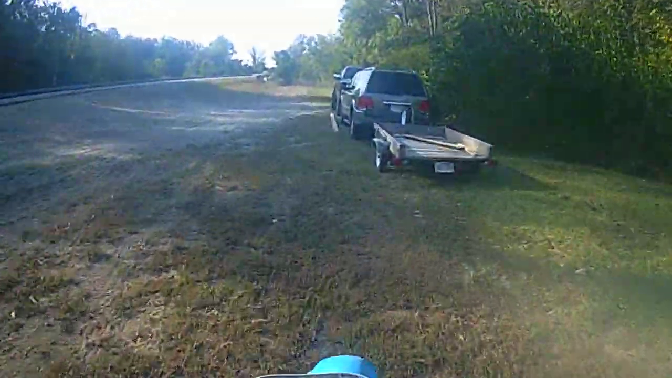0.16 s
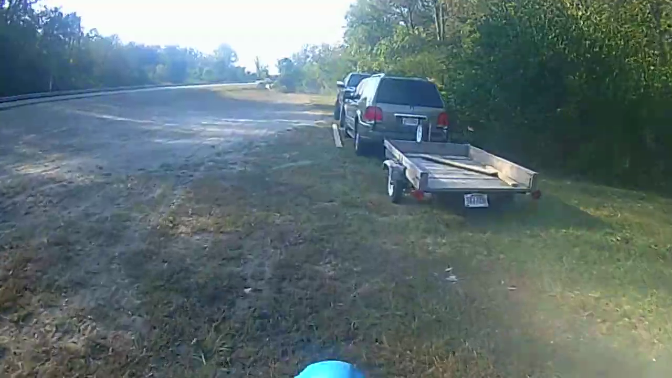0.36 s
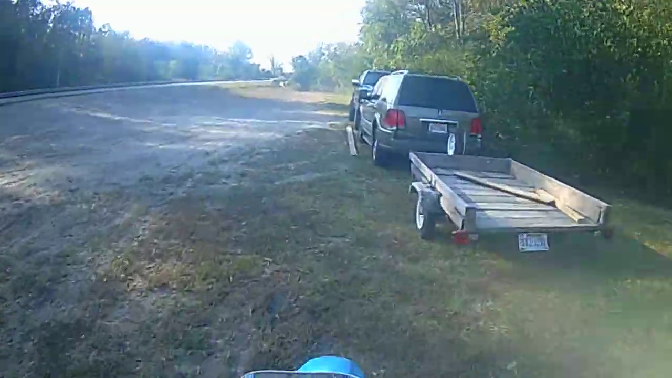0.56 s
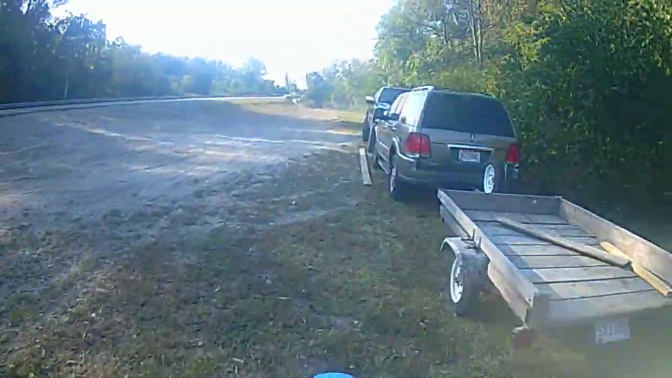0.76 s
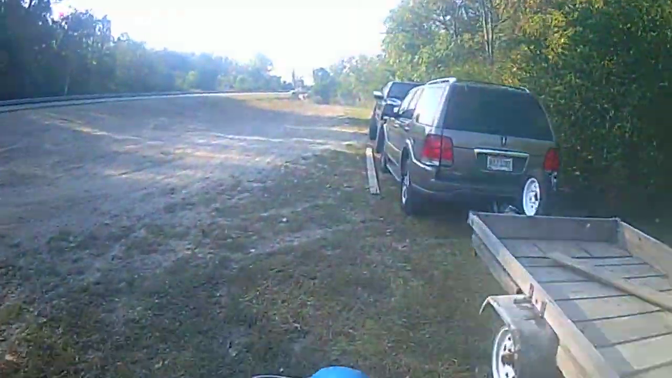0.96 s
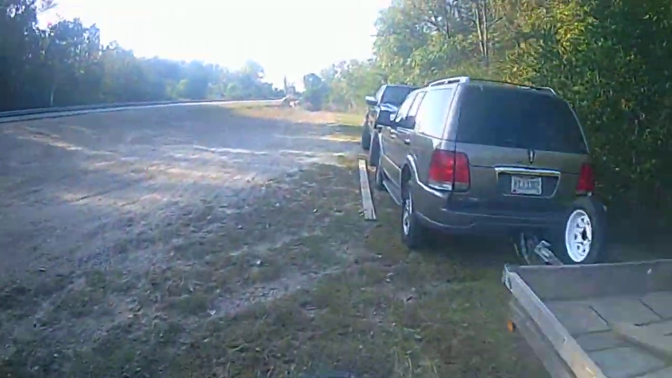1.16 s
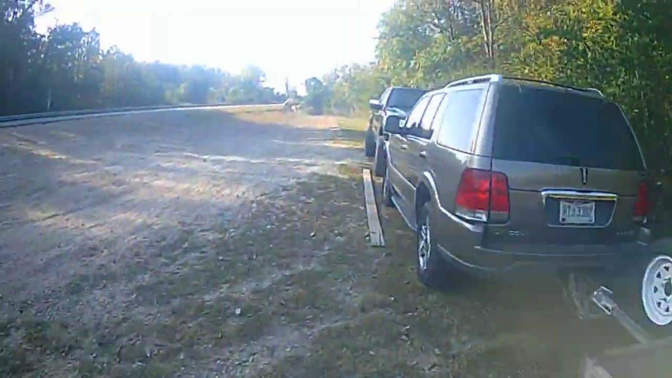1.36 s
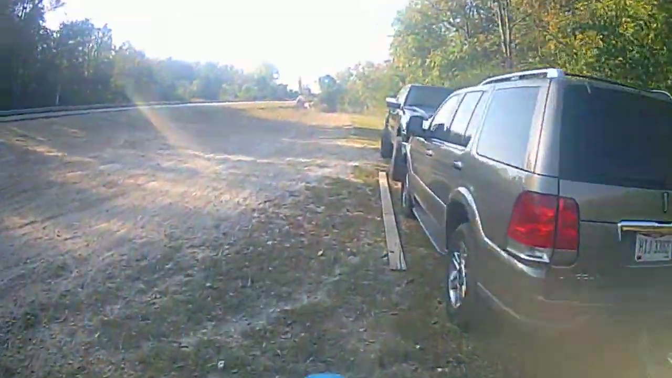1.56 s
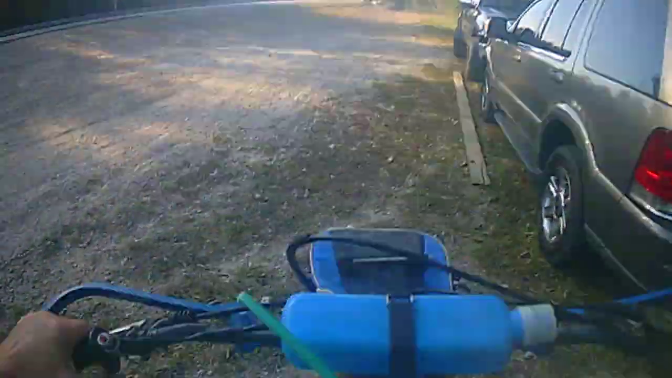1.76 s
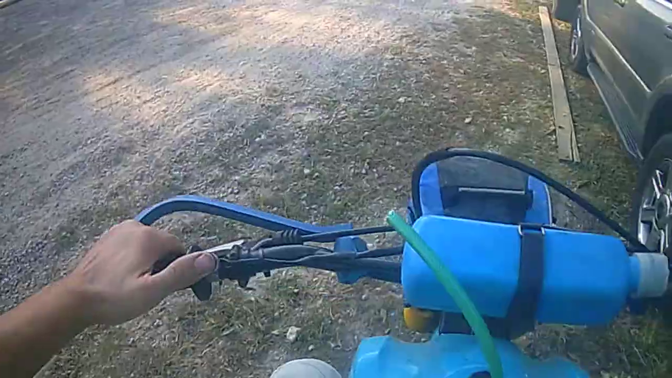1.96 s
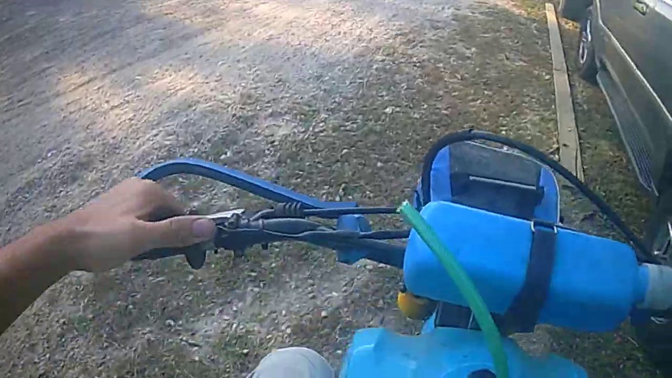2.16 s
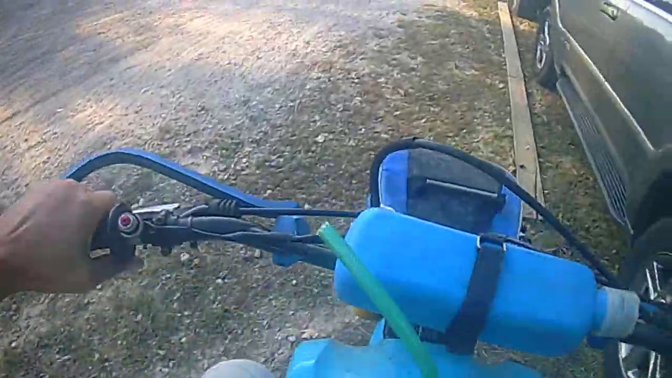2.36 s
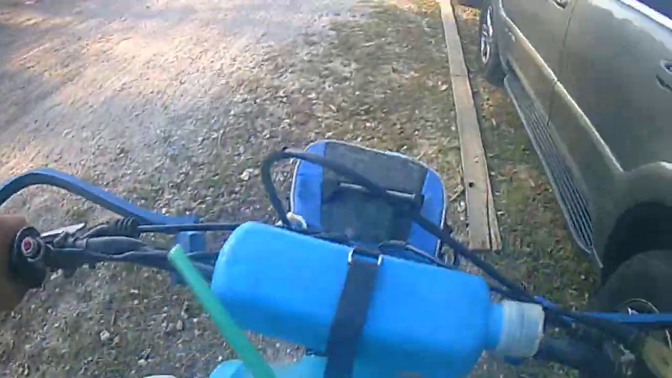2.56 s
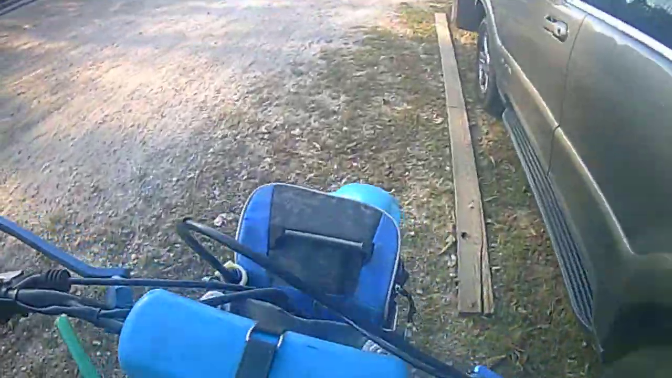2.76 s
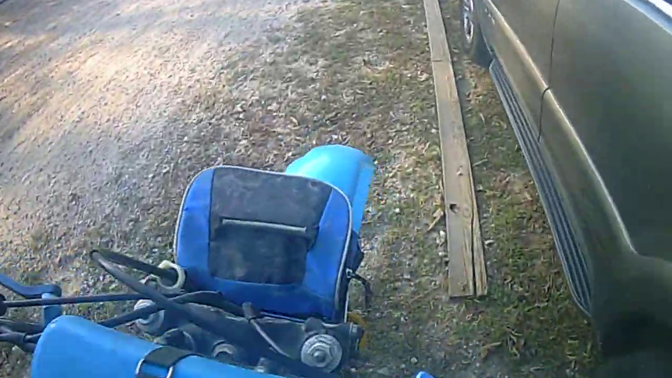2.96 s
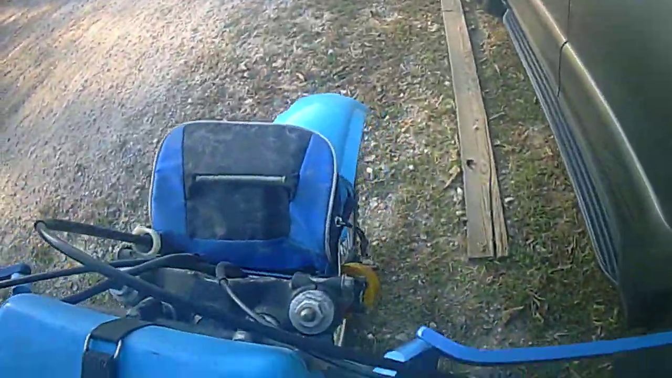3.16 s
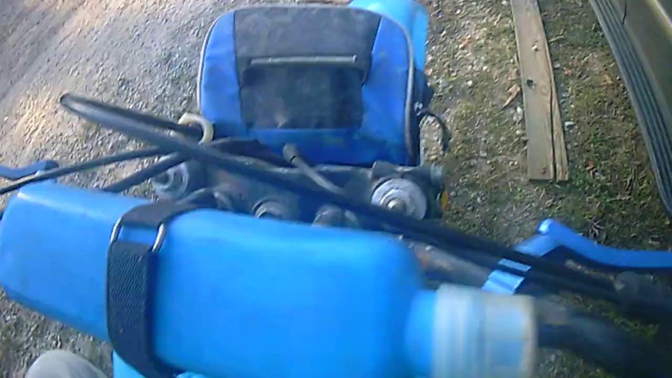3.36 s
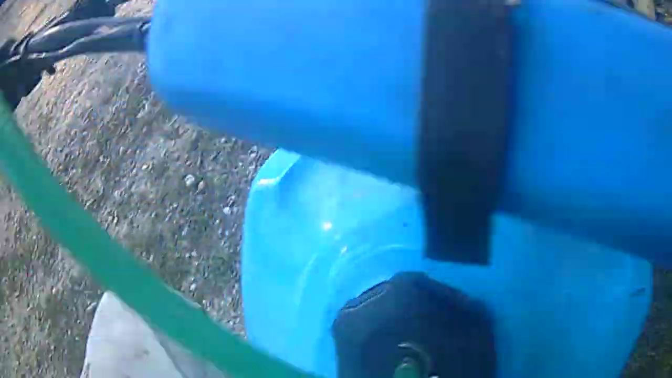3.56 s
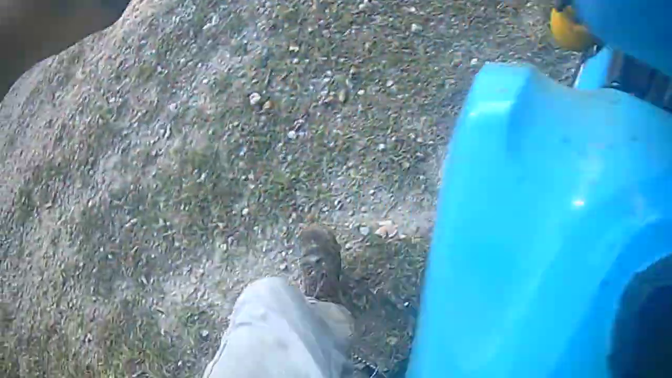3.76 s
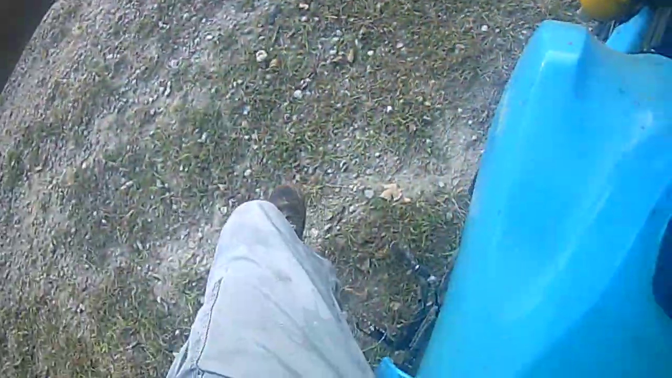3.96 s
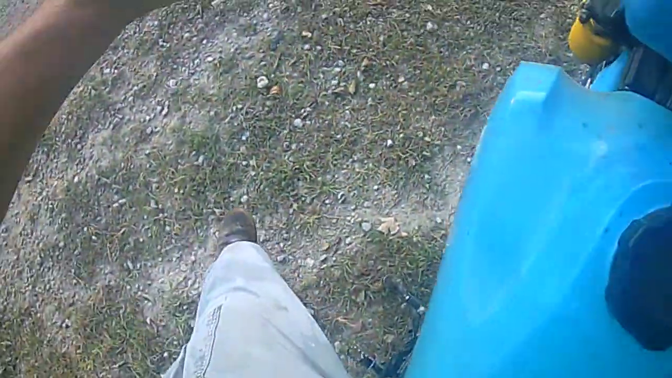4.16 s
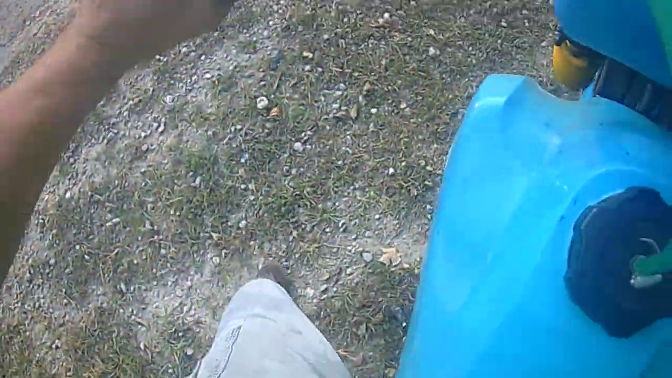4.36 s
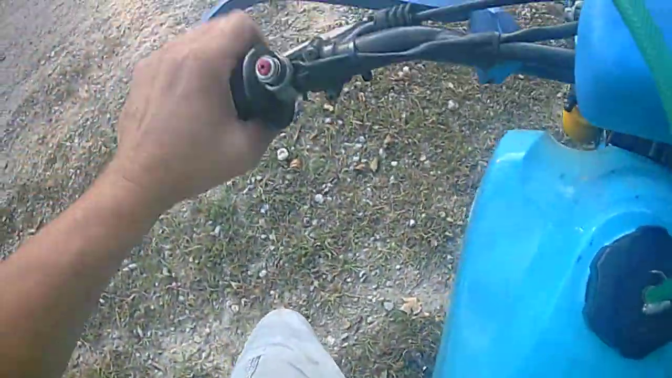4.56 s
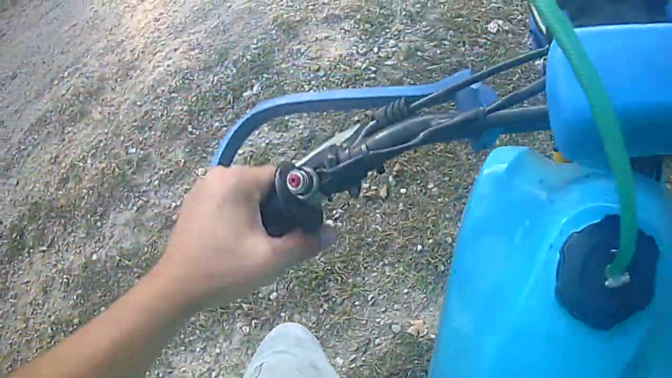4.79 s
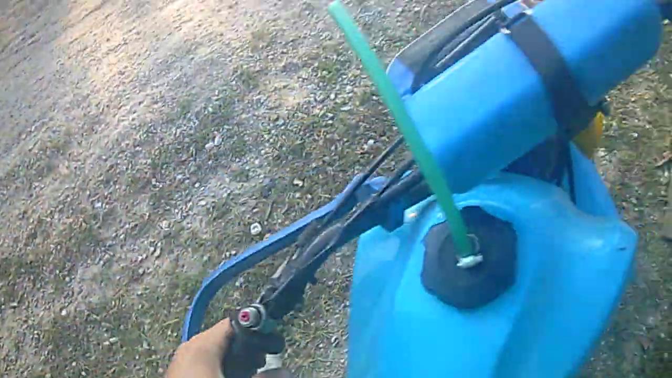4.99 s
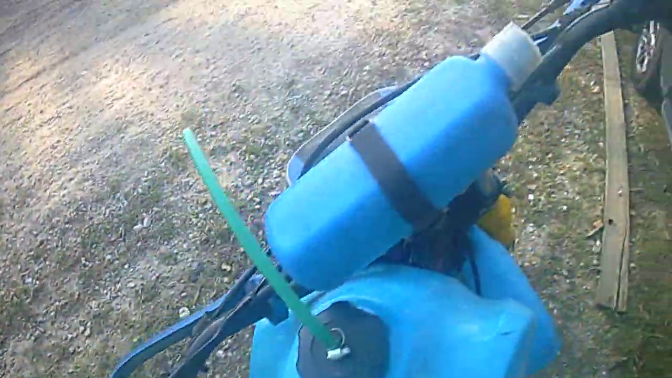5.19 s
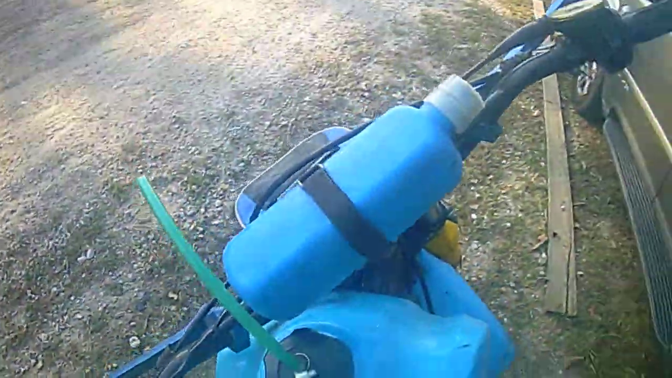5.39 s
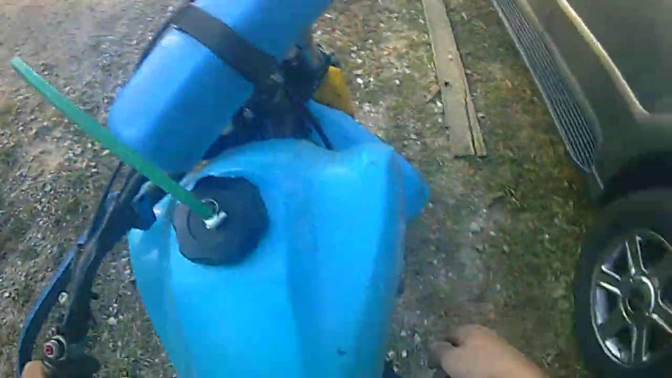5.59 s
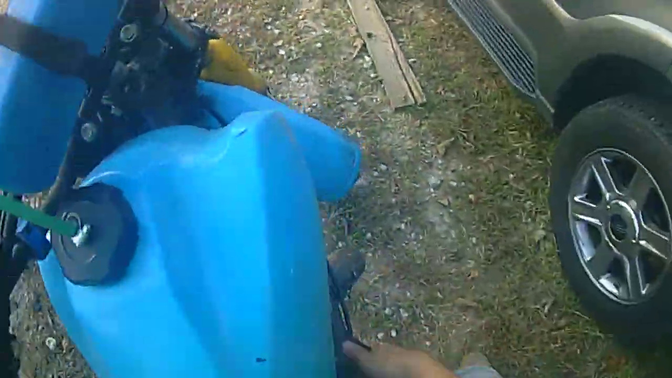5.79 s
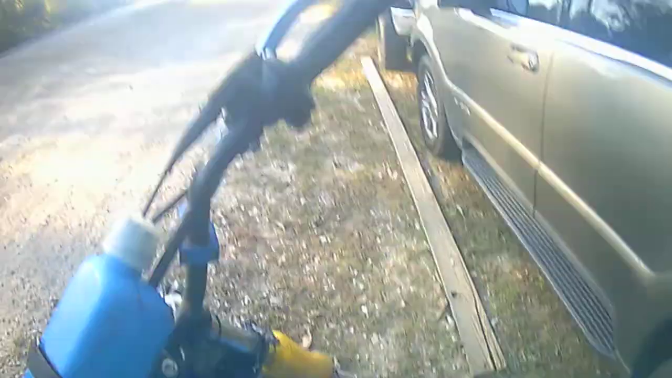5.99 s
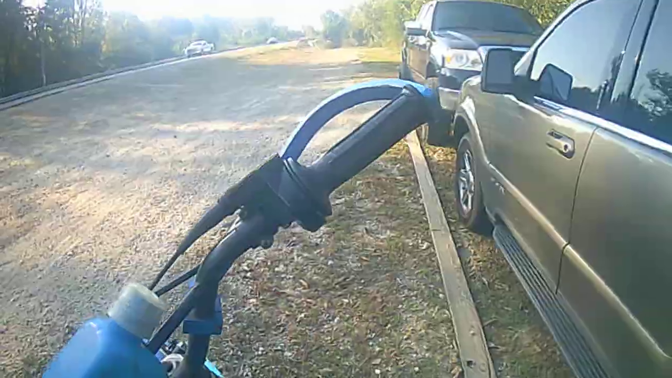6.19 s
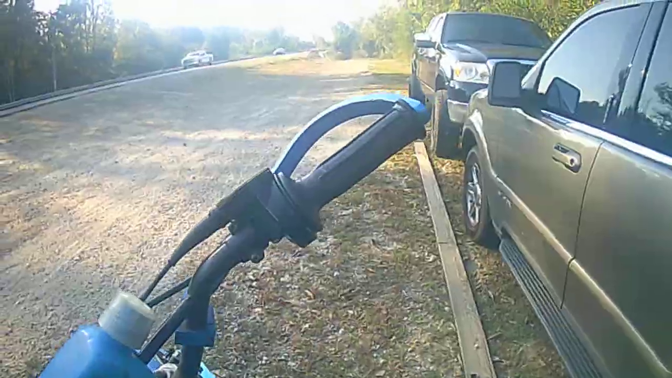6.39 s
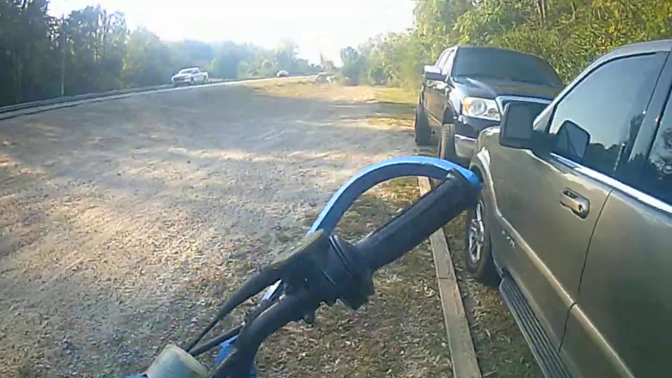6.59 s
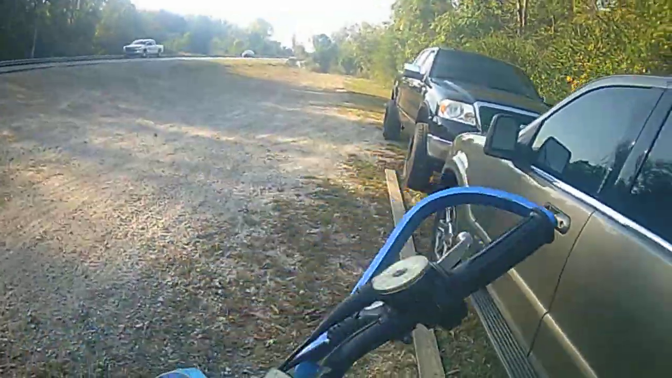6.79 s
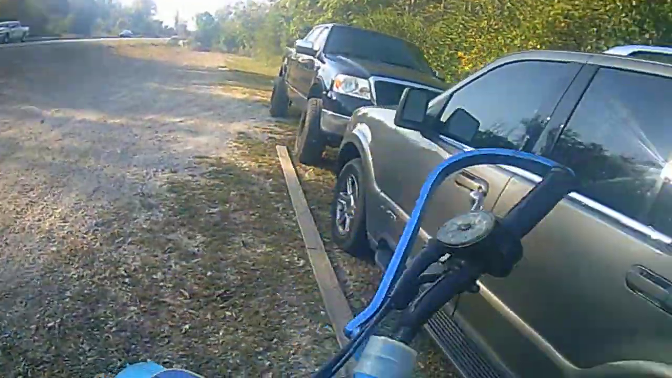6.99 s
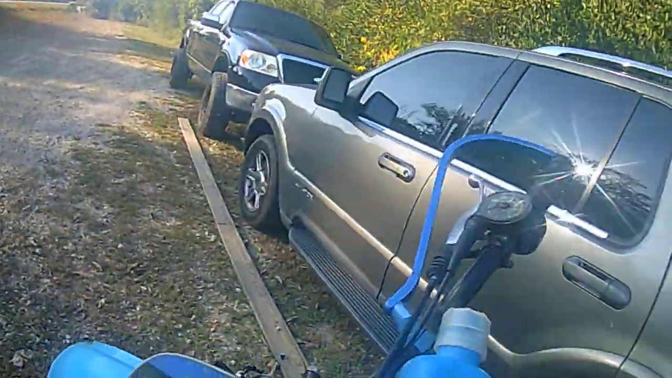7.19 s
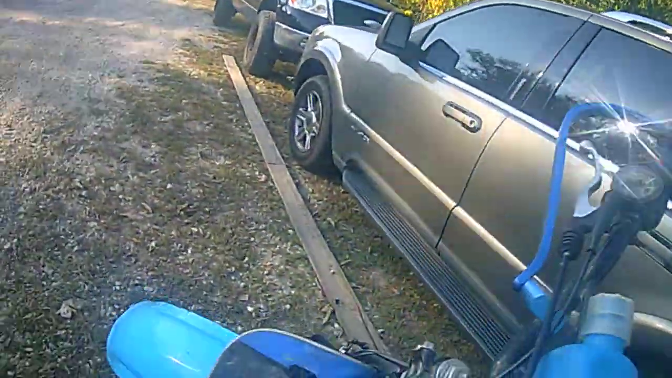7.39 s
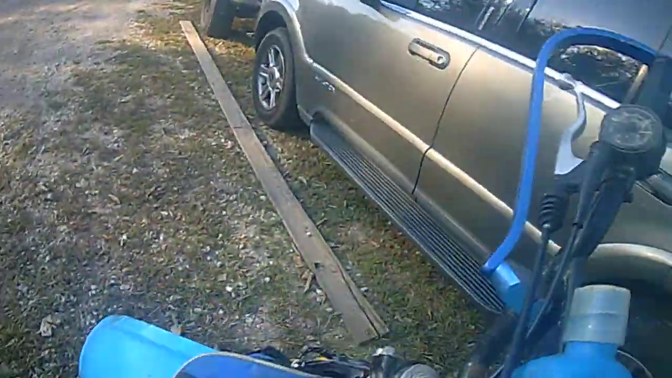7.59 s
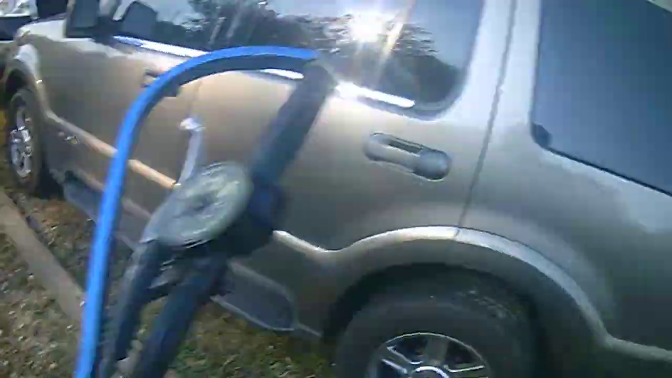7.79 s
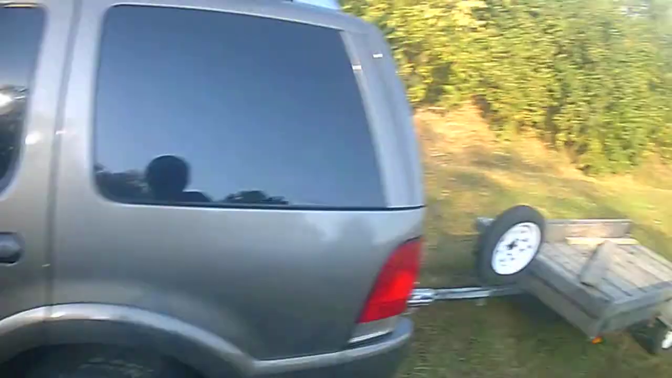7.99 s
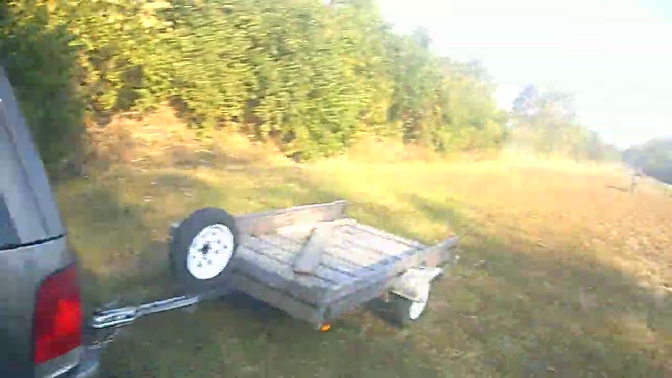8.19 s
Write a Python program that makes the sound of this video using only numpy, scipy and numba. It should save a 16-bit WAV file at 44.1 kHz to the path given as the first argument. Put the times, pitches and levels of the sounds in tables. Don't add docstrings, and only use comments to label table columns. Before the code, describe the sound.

A dirt bike engine putters through buffeting wind, cuts out and stumbles to a stop, followed by metallic knocks and a car approaching on a nearby road.

```python
import sys
import numpy as np
from scipy import signal
from scipy.io import wavfile
from scipy.ndimage import uniform_filter1d
from numba import njit

SR = 44100
rng = np.random.default_rng(int(sys.argv[2]) if len(sys.argv) > 2 else 0)


def generate_wav(signal):
    frames = np.transpose(np.atleast_2d(signal))
    scaled = np.clip(frames, -1, 1) * 32767
    pcm = np.round(scaled).astype(np.int16)
    wavfile.write(sys.argv[1], SR, pcm)


def magnitude_from_level(level_db):
    exponent = np.asarray(level_db, float) / 20
    return 10 ** exponent


N = 363384
TIME = np.arange(N) / SR


def level(x, db):
    return x * magnitude_from_level(db) / np.sqrt(np.mean(x ** 2))


def columns(table):
    s, *rest = np.transpose(table)
    return [np.interp(TIME, s, c) for c in rest]


def after(s, rise):
    return np.clip((TIME - s) / rise, 0, 1)


def dip(s, db, width):
    return db * np.exp(-((TIME - s) / width) ** 2)


def emerging(far_db, s, db_per_s):
    return far_db + db_per_s * np.maximum(TIME - s, 0)


def noise():
    return rng.standard_normal(N)


def walk(rate):
    hold = int(SR / rate)
    steps = np.repeat(rng.standard_normal(N // hold + 1), hold)
    return 0.91 * uniform_filter1d(uniform_filter1d(steps, hold), hold)[:N]


@njit
def svf(x, hz, width):
    y, b, l = np.empty(len(x)), 0., 0.
    g, k = np.tan(np.pi * hz / SR), width / hz
    for i in range(len(x)):
        v = (b + g * (x[i] - l)) / (1 + g * (g + k))
        b, l, y[i] = 2 * v - b, l + 2 * g * v, k * v
    return y


def ring(x, modes, order=1):
    out = 0
    for k, (hz, width, db) in enumerate(modes):
        y = x + 1e-18
        for _ in range(order):
            y = svf(y, float(hz), float(width))
        out = out + (-1) ** (k * order) * magnitude_from_level(db) * y
    return out


def low_pass(x, hz, order):
    return signal.sosfilt(signal.butter(order, hz, fs=SR, output="sos"), x)


def engine_levels(octaves):
    # time in seconds, level in dB.
    exhaust = [(0, -0.5), (1.5, -1.06), (2.0, -2.5), (2.1, -8.5), (2.3, -6), (2.45, -8.5), (2.62, -18.5),
               (2.82, -17.5), (2.97, -24), (3.14, -22), (3.36, -36), (3.7, -52)]
    throttle_shut_s, drive_stops_s = 1.98, 2.93
    pipe = columns(exhaust)[0]
    stopped = after(drive_stops_s, 0.076)
    coasting = after(throttle_shut_s, .12) - after(drive_stops_s, 0.25)
    silencer = pipe - 9 + 8 * coasting
    thump_top = -13.5 - 4 * (1 - after(2.4, .1))
    thump = np.minimum(pipe - 2, thump_top) + dip(2.2, -4.5, .25)
    clatter = -14.5 - 5 * octaves * (1 + 0.46 * stopped) - 4.5 * stopped
    airbox = -18.5 - 6 * octaves + dip(2.7, -9.5, 0.16)
    heave = -28 - 15 * (1 - stopped) - 6 * np.maximum(octaves - 2, 0)
    panel = pipe - 41 + dip(2.05, 25, .35)
    return pipe, silencer, thump, clatter, airbox, heave, panel


def engine():
    # time in seconds, speed in turns per s.
    crank = [(0, 42.2), (.35, 41.07), (1.15, 40.06), (2.05, 34.3), (2.2, 30.8), (2.23, 37.7), (2.45, 28.97),
             (2.95, 13.62), (3.15, 10.35), (3.6, 4.1), (3.8, .1)]
    # centre in Hz, width in Hz, level in dB.
    pipe = [(283.35, 86.4, 6), (248.3, 34.3, -4.5), (376.8, 19, -20.5)]
    # centre in Hz, width in Hz, level in dB.
    silencer = [(196.3, 53, 0)]
    # centre in Hz, width in Hz, level in dB.
    thump = [(100.6, 87, 0)]
    # centre in Hz, width in Hz, level in dB.
    casing = [(1851, 226, 0), (1265, 330, -3), (532, 453, -3), (2393, 180, -6.5), (358, 235, 8)]

    crank_speed = columns(crank)[0]
    lead = int(.008 * SR)
    turns = -.57 + np.cumsum(crank_speed) / SR + lead * crank_speed / SR
    hunting = .035 * walk(14) * (1 - .7 * after(2.0, .1)) * (TIME < 2.6)
    turns = np.maximum.accumulate(turns + hunting)
    whole = np.floor(turns).astype(int) + 4
    chance = rng.standard_normal((120, 2))
    speed = np.maximum(np.gradient(turns), 5 / SR)

    new_turn = np.diff(whole, prepend=whole[0]) == 1
    puffs = new_turn * magnitude_from_level(1.7 * chance[whole, 0]) / np.sqrt(speed)
    puff_s = .0024
    puffs = np.convolve(puffs, np.hanning(int(puff_s * SR)))[:N] / np.sqrt(.375 * puff_s * SR)
    bounce = after(2.5, 0.48)
    returns = 0.29 * np.roll(puffs, int(0.01313 * SR)) + 0.49 * np.roll(puffs, int(.0275 * SR))
    puffs = puffs + bounce * returns
    turbulence_db = np.interp(TIME, [2.0, 2.6, 2.9, 3.0], [-11, -1, 0, -2])
    gas = puffs + magnitude_from_level(turbulence_db) * np.exp(-(turns % 1) / .5) * noise()

    slap = 1.8 + magnitude_from_level(3 * chance[whole, 1]) * np.exp(-((turns - .6) % 1) / 1.2)
    grit = magnitude_from_level(1.3 * uniform_filter1d(noise(), size=60) * np.sqrt(60))
    clatter = ring(slap * grit * noise(), casing, order=2)
    unrung_slap = (0.35 + np.exp(-((turns - .62) % 1) / 0.15)) * grit * noise()
    clatter = clatter / clatter.std() + level(unrung_slap, -5.5)

    parts = [
        ring(gas, pipe, order=2),
        ring(gas, silencer, order=2),
        -ring(np.roll(gas, int(0.0026 * SR)), thump, order=2),
        clatter,
        ring(gas, [(37.9, 37, 0)], order=2),
        ring(gas, [(24, 8.8, 0)], order=2),
        ring(gas, [(666.4, 38, 0)], order=2),
    ]
    octaves = np.log2(crank[0][1] / crank_speed)
    out = 0
    for part, db in zip(parts, engine_levels(octaves)):
        out = out + part / part[TIME < 2].std() * magnitude_from_level(db)
    return np.clip((3.75 - TIME) / 0.078, 0, 1) * out


def wind():
    # time in seconds, peak in dB.
    gust_peaks = [
        (0, -6.5),
        (.21, -5),
        (.62, -6),
        (1.298, -15.5),
        (1.572, -10),
        (2.3, -22.5),
    ]
    breeze_db, rise_db_s, fall_db_s = -23.5, 291, 59
    buffet = ring(noise(), [(54.0, 123, 0)], order=2) * magnitude_from_level(0.75 * walk(17))
    gusts = [db - np.maximum(rise_db_s * (s - TIME), fall_db_s * (TIME - s)) for s, db in gust_peaks]
    wind_db = np.maximum(np.max(gusts, axis=0), breeze_db) - 3.0
    return level(buffet, wind_db) * np.clip((2.6 - TIME) / 0.86, 0, 1)


def contacts(rows):
    out = 0
    for s, db, contact_s in rows:
        age = np.maximum(TIME - s, 0) / contact_s
        out = out + np.minimum(age * 3, 1) * np.exp(-age) * magnitude_from_level(db)
    return out


def knocks():
    # start in seconds, peak in dB, contact in seconds.
    ticks = [
        (2.2004, 3.5, 0.0073),
        (3.7195, -17.5, 0.0043),
        (4.463, -20.5, 0.0049),
        (4.487, -26, .005),
        (4.6324, -23.5, 0.0081),
    ]
    # start in seconds, peak in dB, contact in seconds.
    clanks = [
        (2.379, -9.5, 0.0083),
        (3.1652, -25, 0.0089),
        (3.4191, -23, 0.014),
        (3.7255, -6.5, 0.0097),
        (3.8796, -33, 0.0079),
        (4.3929, -29, 0.0073),
        (4.9435, -11, 0.0038),
    ]
    # start in seconds, peak in dB, contact in seconds.
    thuds = [
        (2.785, -15, 0.0034),
        (3.0716, -22, 0.0064),
        (3.643, -24.5, 0.0068),
        (3.692, -23, 0.0052),
        (3.841, -23.5, 0.012),
        (4.871, -27.5, 0.008),
        (4.906, -23, 0.0058),
        (4.955, -15.5, 0.0043),
        (8.112, -38, 0.0026),
    ]
    # start in seconds, peak in dB, contact in seconds.
    scuffs = [
        (2.9301, -27, .011),
        (3.293, -33, 0.0055),
        (3.327, -23.5, 0.0074),
        (4.445, -35, .0067),
        (4.962, -25, 0.0077),
        (4.9742, -20.5, 0.0037),
        (4.9854, -26.5, 0.011),
        (5.019, -28, 0.0042),
    ]
    # start in seconds, peak in dB, contact in seconds.
    pings = [(2.745, -18.5, .005), (2.806, -19, 0.0053), (2.87, -20, 0.0075), (2.932, -34, 0.0032),
             (2.99, -23, .005), (3.03, -30, .012), (3.115, -16, 0.006), (3.17, -23, 0.0041),
             (3.33, -15.5, 0.0046), (7.873, -31, .003), (7.908, -39, 0.0033), (7.99, -25, .003),
             (8.018, -25, 0.0049), (8.07, -33, .003)]
    # centre in Hz, width in Hz, level in dB.
    metal = [(1240, 70, 2.5), (1750, 82, 13), (2070, 99, -4), (1900, 30, 8.5), (2280, 220, -34),
             (3120, 140, -9), (1380, 1400, 2), (3500, 1000, -4.5), (1070, 120, -9), (4420, 220, 3.5)]
    # centre in Hz, width in Hz, level in dB.
    frame = [(420, 95, -5), (232, 35, -0.5), (140, 21, -6), (541, 58, -7), (700, 19, -16)]
    # centre in Hz, width in Hz, level in dB.
    tank = [(659, 60, -7), (1054, 48, 2.5)]
    # centre in Hz, width in Hz, level in dB.
    lever = [(1815, 17, 12.5), (2900, 28, 3), (4230, 60, 3.5), (3500, 900, -5), (1990, 49, 2)]

    pushes = [contacts(rows) for rows in (clanks, thuds, ticks, scuffs)]
    frame_push = magnitude_from_level([-1.6, 6.5, -21, 2.6]) @ pushes
    grit_push = magnitude_from_level([-32.5, -41.5, -22.5, -16.5]) @ pushes
    out = magnitude_from_level(2.5) * ring(sum(pushes) * noise(), metal)
    out = out + magnitude_from_level(21.5) * ring(frame_push * noise(), frame)
    out = out + magnitude_from_level(31.0) * ring(grit_push * noise(), [(6500, 14000, 0.0091)])
    out = out + magnitude_from_level(10) * ring((pushes[0] + 1.6 * pushes[1]) * noise(), tank)
    return out + magnitude_from_level(14) * ring(contacts(pings) * noise(), lever)


def tone(table, wobble):
    hz, db = columns(table)
    phase = 2 * np.pi * np.cumsum(hz * (1 + wobble * walk(3.1))) / SR
    return np.sqrt(2) * magnitude_from_level(db + 2.7 * walk(34)) * np.sin(phase)


def car():
    # time in seconds, level in dB.
    tyre_roar = [(3.5, -44), (4.25, -45.5), (5.4, -39.5), (5.95, -41.5), (6.5, -38), (7.1, -36.5),
                 (8.24, -40)]
    # time in seconds, pitch in Hz, level in dB.
    drone = [(3.4, 129, -37.5), (3.84, 132.7, -41), (5, 134.7, -39.5), (6, 136.6, -42), (7, 138.8, -41),
             (7.6, 133.4, -42), (8.24, 142.6, -40.5)]
    # time in seconds, pitch in Hz, level in dB.
    whine = [(3.4, 222, -83.5), (3.6, 220, -51), (3.95, 235.6, -33), (4.1, 239, -64), (8.3, 213, -99)]
    # centre in Hz, width in Hz, level in dB.
    rumble_bands = [(31.7, 71, -3.5), (83, 8.9, -3), (175.7, 40, -2.5), (210, 19, 0.5), (241.6, 49, -3.5)]

    swell = 1.0 * walk(3)
    roar = ring(noise(), [(1242, 470, 0.085), (1480, 590, 0), (1780, 700, 0.84)], order=2)
    roar = low_pass(roar, 1805, order=4)
    roar = roar - ring(roar, [(826, 74, 0.01)])
    roar = level(roar, columns(tyre_roar)[0] + swell + 1.2 * walk(11))

    body = ring(noise(), [(446, 270, 2.5), (594, 200, -8.5)], order=2)
    upper_db = np.interp(TIME, [6, 7.2], [-14, 0])
    body = body + magnitude_from_level(upper_db) * ring(noise(), [(890, 280, 0.033)], order=2)
    body = level(body, emerging(far_db=-48, s=5.96, db_per_s=3.76) + swell + 1.5 * walk(14))

    hiss_db = emerging(far_db=-55.5, s=6.17, db_per_s=5.7) + 1.1 * walk(12)
    hiss = level(ring(noise(), [(2900, 1200, 0)], order=2), hiss_db)
    rumble_db = emerging(far_db=-35.5, s=6.74, db_per_s=1.8) + swell + 0.77 * walk(5.5)
    rumble = level(ring(noise(), rumble_bands, order=2), rumble_db)
    return roar + body + hiss + rumble + tone(drone, 0.0045) + tone(whine, 0.0049)


def air():
    # time in seconds, pitch in Hz, level in dB, length in seconds.
    chirps = [
        (8.148, 2900, -40, 0.011),
        (8.192, 2900, -31, 0.007),
    ]
    hiss = ring(noise(), [(7250, 2000, -14.5), (3960, 1000, -17)])
    out = level(hiss, -46 + 9 * after(7.5, 1) + walk(5))
    for s, hz, db, length in chirps:
        out = out + magnitude_from_level(db) * np.exp(-((TIME - s) / length) ** 2) * np.sin(2 * np.pi * hz * TIME)
    return out


def scene():
    return (engine() + wind() + knocks() + car() + air())[None]


def housing(x):
    port = ring(x, [(6400, 2230, -26.5), (3980, 1600, -37), (5400, 5400, -34.0)], order=2)
    return low_pass(x, 2168, order=5) + port


def top_cut(x):
    return signal.sosfilt(signal.butter(12, 15870, fs=SR, output="sos"), x)


def record(dry):
    ceiling = .712
    muffled = low_pass(housing(dry[0]), 8850, order=8)
    clipped = np.clip(muffled, -ceiling, ceiling)[None]
    dull = signal.sosfiltfilt(signal.butter(3, 8200, fs=SR, output="sos"), clipped)
    shelved = dull + magnitude_from_level(-10.0) * (clipped - dull)
    return top_cut(shelved - .004)


dry = scene()
out = record(dry)
generate_wav(out)
```